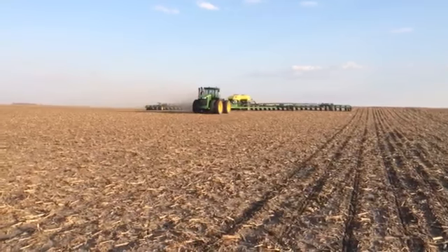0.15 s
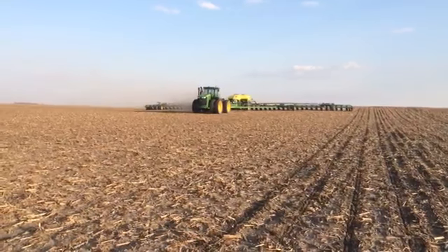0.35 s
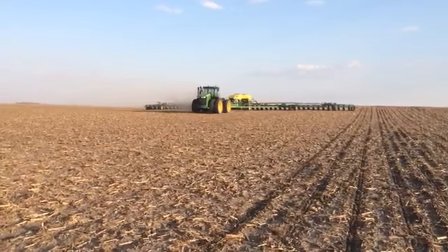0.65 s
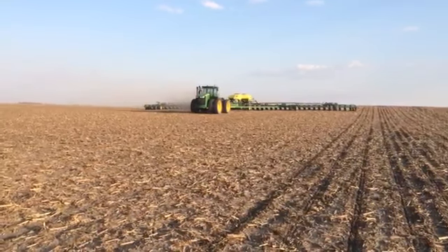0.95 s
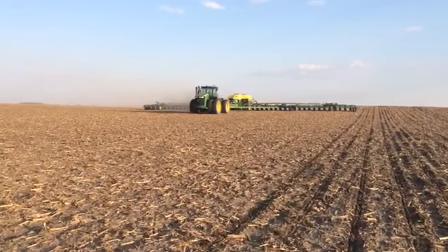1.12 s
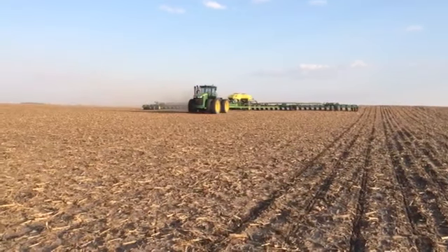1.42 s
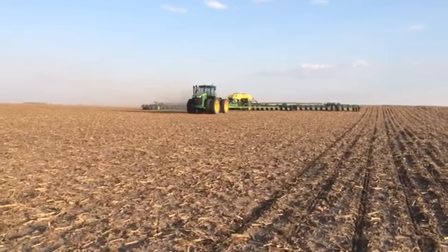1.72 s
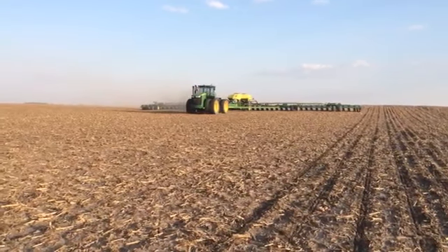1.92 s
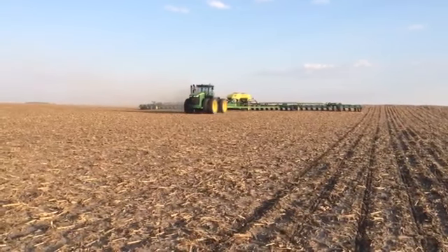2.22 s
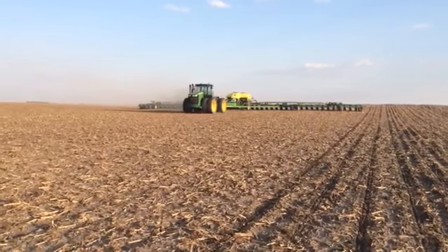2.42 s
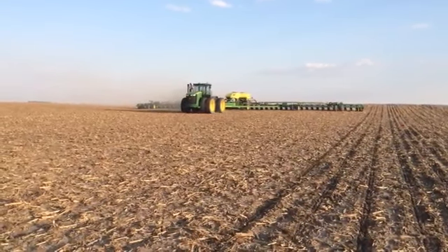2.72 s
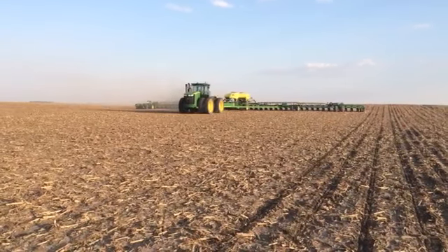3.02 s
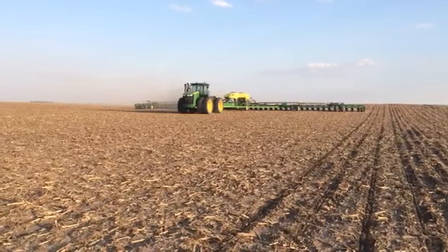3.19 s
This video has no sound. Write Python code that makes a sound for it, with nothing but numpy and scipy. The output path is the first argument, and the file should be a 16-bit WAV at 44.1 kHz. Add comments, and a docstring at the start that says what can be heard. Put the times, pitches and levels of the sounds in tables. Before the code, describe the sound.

Steady far-off tractor drone and thin high whine, outdoors in one channel. Low wind puffs knock irregularly on the nearby microphone, small squeaks are clearest after two seconds, and strong puffs hit near the end.

```python
"""A distant tractor pulls a wide planter over a dry field: noise roar, hissing rows, two sine fan notes.
From the start the air makes the whine flutter, and wind knocks on the microphone in short, dull puffs.
Small squeaks and rings, short sines, come and go; the clearest squeaks fall after two seconds.
Just past two seconds two gusts sweep upward as rising tones. Near the end a pair of strong puffs hits
and the upper fan note dips; by then the fan has crept up slightly and the treble of the hiss has grown."""
import sys
import numpy as np
from scipy import signal
from scipy.fft import rfft, irfft
from scipy.io import wavfile

SR = 44100
rng = np.random.default_rng(int(sys.argv[2]) if len(sys.argv) > 2 else 0)


def to_wav(s):
    """Save 16-bit WAV."""
    ch = np.atleast_2d(s).T  # columns
    pcm = np.round(np.clip(ch, -1, 1) * 32767)  # PCM
    wavfile.write(sys.argv[1], SR, pcm.astype(np.int16))


N = 147735

# Strength of the wind, for rumble and small eddies: t/s, relative level/dB
BREEZE = [(0, 5), (.1, 4), (.19, -15), (.26, 1), (.32, -9), (.48, 1.5), (.6, -9), (.75, 5.5), (1.02, 0.5),
          (1.18, -2), (1.5, 5), (1.58, -5), (1.7, 2), (2.25, 2), (2.55, 1), (3.05, 4), (3.22, -3),
          (3.35, -2)]
# Lumpy rumble between the puffs, spectrum shape: f/Hz, relative level/dB per Hz
RUMBLE_SPECTRUM = [(15, -30), (30, -20), (52, 3), (100, 5.5), (200, -1), (300, -13), (500, -12.5),
                   (900, -68), (3000, -66)]
# Puffs of wind on the microphone, slow thumps and quick flaps:
# t/s, centre f/Hz, time from peak to 1/e /s, level/dB (as the rms of a 10 ms sound of equal energy)
PUFFS = [(.013, 114, 0.0053, -19.5), (.046, 344, 0.0011, -24), (.075, 84, 0.0093, -21),
         (.078, 300, .0016, -29), (.158, 150, 0.0039, -28.5), (.263, 94, 0.0052, -23),
         (.368, 83, 0.0067, -21), (.413, 278, 0.001, -25), (.437, 251, 0.0018, -20.5),
         (.442, 82.6, 0.0095, -22), (.497, 93, 0.0056, -22), (.534, 83, 0.0069, -20),
         (.647, 346, 0.0014, -16.5), (.652, 453, .004, -23.5), (.657, 343, 0.0052, -25),
         (.706, 250, .002, -29), (.723, 198, .008, -24), (.728, 480, 0.0024, -28), (.775, 118, 0.0046, -20),
         (.812, 200, 0.0031, -22.5), (.857, 180, 0.0029, -23.5), (.863, 440, 0.0015, -24.5),
         (.946, 105, .004, -21.5), (.967, 104, 0.0026, -25), (.978, 190, 0.0021, -17.5),
         (1.014, 390, 0.0027, -24.5), (1.019, 145, .003, -25.5), (1.058, 83, 0.016, -24),
         (1.253, 143, 0.0048, -23), (1.257, 550, 0.0015, -20), (1.352, 161, 0.0021, -24.5),
         (1.429, 106, 0.0039, -24.5), (1.442, 93, 0.0033, -25.5), (1.513, 60, 0.014, -21),
         (1.523, 227, 0.0043, -25), (1.62, 374, 0.0032, -20), (1.628, 129, 0.012, -26),
         (1.657, 83, 0.005, -20), (1.669, 525, 0.004, -25), (1.671, 145, 0.0025, -22),
         (1.679, 310, 0.00083, -21.5), (1.748, 311, 0.001, -26), (1.756, 99, 0.0071, -28),
         (1.813, 278, 0.0023, -25.5), (1.99, 130, 0.0034, -25), (1.999, 435, 0.0017, -24.5),
         (2.035, 196, 0.0044, -22), (2.137, 82, 0.0053, -20), (2.192, 93, 0.0096, -21),
         (2.222, 278, 0.00099, -25.5), (2.275, 178, 0.0052, -21), (2.316, 83, 0.0093, -31),
         (2.403, 89.5, 0.0079, -26), (2.445, 410, 0.0034, -27), (2.452, 110, 0.0025, -23.5),
         (2.57, 139, 0.0047, -25), (2.66, 400, 0.0008, -28), (2.666, 93, 0.014, -29),
         (2.708, 93, 0.0043, -24.5), (2.794, 206, 0.0037, -26), (2.94, 93, 0.011, -21.5),
         (2.944, 482, 0.0019, -26.5), (2.998, 116, .011, -24), (3.074, 376, 0.0039, -26),
         (3.12, 138, 0.0037, -16.5), (3.126, 452, .003, -22), (3.131, 161, 0.0026, -18.5),
         (3.189, 142, 0.0054, -23)]
# Turbulence around a puff, spectrum shape: f/Hz, relative level/dB per Hz
SWIRL_SPECTRUM = [(20, -20), (70, 0.5), (170, 3), (300, -3.5), (500, -1.5), (700, -13.5), (1100, -26),
                  (2500, -58), (6000, -90)]
# Gusts that sweep upward: t/s, start f/Hz, end f/Hz, time from peak to 1/e /s, level/dB
GUSTS = [(2.06, 145, 508, 0.013, -24), (2.284, 258.3, 628, 0.0066, -26.5)]
# Faint squeaks of the row units: t/s, f/Hz, length between 1/e points/s, level/dB
SQUEAKS = [(.23, 5170, .06, -60), (.54, 2070, .03, -48), (.8, 5130, .05, -61), (1.18, 5210, .04, -58),
           (1.57, 5930, .14, -59), (1.985, 5000, .032, -50.5), (2.04, 5160, .06, -55),
           (2.11, 2024, .07, -41), (2.13, 5120, .05, -55), (2.32, 2020, .045, -45),
           (2.76, 2040, .04, -39.5)]
# Hiss of air and dry stubble, spectrum shape: f/Hz, relative level/dB per Hz
HISS_SPECTRUM = [(20, -36), (2000, -32), (2650, -7), (3200, 1.5), (3650, 2), (4200, -3), (4750, -7),
                 (6000, -7), (6800, -15.5), (7900, -16.5), (9500, -23), (11000, -26), (12300, -33.5),
                 (15000, -35)]
# Swell of the hiss: t/s, relative level/dB
HISS_SWELL = [(0, -2), (.6, 1), (.98, -1.5), (1.2, 0.5), (1.45, -0.5), (2.0, 1.6), (2.3, -1), (2.7, 2.5),
              (3, 2), (3.2, -0.5), (3.35, 1)]
# Roar of engine and planter, spectrum shape: f/Hz, relative level/dB per Hz
ROAR_SPECTRUM = [(20, -33), (60, -1), (110, -0.5), (250, -5.5), (420, -5.5), (620, -2.5), (720, -1),
                 (820, -4.5), (950, -3.5), (1130, -3.5), (1390, -2), (1490, -5.5), (1720, -6.5),
                 (1820, -10.5), (2080, -9.5), (2420, -15.5), (2600, -28), (3000, -47), (16000, -88)]
# Swell of the roar: t/s, relative level/dB
ROAR_SWELL = [(0, -0.5), (.43, 1.1), (.72, -0.1), (1.55, 1.6), (2.25, 1), (2.7, 1.5), (3.05, 3), (3.2, 0),
              (3.35, 3)]
# Fainter hums and whistles of the machinery: f/Hz, width/Hz, level/dB
WHINES = [(613, 4, -52), (932, 6, -53), (1030, 6, -52), (1084, 4, -51.5), (1226, 5, -54), (1338, 5, -53),
          (1400, 14, -50), (1868, 10, -58), (2029, 12, -52.5), (4660, 30, -73), (5140, 40, -65.5),
          (5601, 40, -72), (7470, 100, -76)]
# Blade rate of the fan: t/s, f/Hz
FAN_PITCH = [(0, 716.2), (.8, 716.1), (1.3, 717), (2.8, 717.2), (3.35, 718)]
# The two fan notes: multiple of the blade rate, steady level/dB before any swell, flutter share (rms)
FAN_NOTES = [(1, -38, 0.18), (2, -40.5, 0.38)]
# Swell of the upper fan note: t/s, relative level/dB
UPPER_NOTE_SWELL = [(0, -1), (.43, 3), (.75, 0), (1.6, 3), (1.85, -1.5), (3.05, 1.5), (3.2, -7.5),
                    (3.35, -1)]

RUMBLE_DB, RUMBLE_LUMPS_DB, RUMBLE_LUMPS_HZ = -35, 2.4, 19
SWIRL_DECAY_S, SWIRL_DB = .011, -7.5  # level against the swing of pressure
SMALL_EDDY_DB, SMALL_EDDY_HZ = -32, 194  # middle values; the breeze shifts the level
SMALL_EDDY_CYCLES = 0.46  # from peak to 1/e
GUST_ROUGHNESS, GUST_JOLTS_HZ = .55, 110
SQUEAK_WAVER_HZ, SQUEAK_WAVER_RATE_HZ = 14, 44
RING_LOW_HZ, RING_HIGH_HZ, RING_S, RING_DB = 1620, 2280, .028, -48
HISS_DB, TREBLE_FROM_HZ, TREBLE_DB_PER_S = -47, 7500, 1
ROAR_DB = -34.5
FIRING_HZ, FIRING_DEPTH = 102.4, .08
FLUTTER_HZ = 27
FADE_S, TOP_HZ = .003, 15000


def amp(db):
    """Turns decibels into gain."""
    return 10 ** (np.asarray(db) / 20)


def unit(x):
    """Scales a sound to rms 1."""
    return x / np.sqrt(np.mean(x ** 2) + 1e-20)


def clock():
    """Gives the time of every sample in seconds."""
    return np.arange(N) / SR


def curve(points):
    """Joins (t/s, value) points by straight lines."""
    return np.interp(clock(), *np.transpose(points))


def colour(x, points):
    """Filters a sound by a spectrum of (f/Hz, level/dB) points, straight on a log-pitch axis."""
    hz, db = np.transpose(points)
    f = np.fft.rfftfreq(len(x), 1 / SR)
    gain = amp(np.interp(np.log(f + 1), np.log(hz), db))
    return irfft(rfft(x) * gain, len(x))


def band(hz, width_hz):
    """Makes noise of rms 1 in a narrow resonance; around 0 Hz it is a slow random drift."""
    f = np.fft.rfftfreq(N, 1 / SR)
    random_phase = np.exp(2j * np.pi * rng.random(len(f)))
    resonance = (f > 0) / (1 + (2 * (f - hz) / width_hz) ** 4)
    return unit(irfft(random_phase * resonance, N))


def drift(rate_hz):
    """Wanders at random with rms 1, mostly slower than the given rate."""
    return band(0, 2 * rate_hz)


def tone(hz):
    """Sounds a sine of rms 1 that follows a pitch curve from a random phase."""
    return np.sqrt(2) * np.cos(2 * np.pi * (np.cumsum(hz) / SR + rng.random()))


def airborne(points, patchy_db, rate_hz, count=9):
    """Makes noise whose bands swell and fade separately on their way through moving air."""
    spectrum = rfft(colour(rng.standard_normal(N), points))
    f = np.fft.rfftfreq(N, 1 / SR)
    # Overlapping triangular bands, evenly spaced in log pitch
    place = np.interp(np.log(f + 1), np.log([400, 12000]), [0, count - 1])
    mix = np.zeros(N)
    for k in range(count):
        share = np.maximum(1 - abs(place - k), 0)
        mix += irfft(spectrum * share, N) * amp(patchy_db * drift(rate_hz))
    return unit(mix)


def eddy(hz, length_s, size=4096):
    """One swing of pressure wrapped in turbulence, with the energy of a 10 ms sound of rms 1."""
    t = (np.arange(size) - size // 2) / SR
    envelope = np.exp(-(t / length_s) ** 2)
    offset = np.exp(-(np.pi * hz * length_s) ** 2)  # leaves no steady push
    swing = envelope * (np.exp(2j * np.pi * hz * t) - offset)
    swing = (swing * np.exp(2j * np.pi * rng.random())).real
    swirl = colour(rng.standard_normal(size) * np.exp(-abs(t) / SWIRL_DECAY_S), SWIRL_SPECTRUM)
    burst = unit(swing) + amp(SWIRL_DB) * unit(swirl)
    return burst * np.sqrt(.01 * SR / np.sum(burst ** 2))


def wind(size=4096, count=70):
    """Eddies hit the microphone as thumps and flaps; small ones fall at random over a lumpy rumble."""
    breeze_db = curve(BREEZE)
    lumps_db = RUMBLE_LUMPS_DB * drift(RUMBLE_LUMPS_HZ)
    rumble = unit(colour(rng.standard_normal(N) * amp(breeze_db + lumps_db), RUMBLE_SPECTRUM))

    places = rng.integers(0, N, count)
    levels_db = SMALL_EDDY_DB + breeze_db[places] + rng.uniform(-4.185, 4.5, count)
    centres = SMALL_EDDY_HZ * 2 ** rng.uniform(-1.176, 1.2, count)  # spread in octaves
    small = zip(places / SR, centres, SMALL_EDDY_CYCLES / centres, levels_db)

    hits = np.zeros(N + 2 * size)
    for s, hz, length_s, db in list(PUFFS) + list(small):
        at = max(round(s * SR), 0)
        hits[at:at + size] += amp(db) * eddy(hz, length_s, size)
    centred = hits[size // 2:][:N]  # each eddy peaks at its listed time
    return centred + amp(RUMBLE_DB) * rumble


def gusts():
    """A quickening gust sheds eddies faster and faster, so its pitch rises, in ragged jolts."""
    out = np.zeros(N)
    jolts = 1 + GUST_ROUGHNESS * drift(GUST_JOLTS_HZ)
    for s, start_hz, end_hz, length_s, db in GUSTS:
        u = (clock() - s) / length_s
        rise = (1 + np.tanh(2 * u)) / 2
        sweep = tone(start_hz + (end_hz - start_hz) * rise)
        out += amp(db) * np.exp(-u ** 2) * jolts * sweep
    return out


def squeaks(count=45):
    """Dry bearings and discs sing briefly; loose steel parts ring at random; each is a short sine."""
    waver_hz = SQUEAK_WAVER_HZ * drift(SQUEAK_WAVER_RATE_HZ)
    t, out = clock(), np.zeros(N)
    rings = []
    for _ in range(count):
        ring_hz = rng.uniform(RING_LOW_HZ, RING_HIGH_HZ)
        rings.append((rng.uniform(0, N / SR), ring_hz, RING_S, rng.normal(RING_DB, 2)))
    for s, hz, length_s, db in list(SQUEAKS) + rings:
        near = abs(t - s) < 2 * length_s
        envelope = np.exp(-(2 * (t[near] - s) / length_s) ** 2)
        out[near] += amp(db) * envelope * tone(hz + waver_hz[near])
    return out


def planter():
    """Rows hiss as patchy noise, its treble slowly growing as the rig comes closer."""
    hiss = airborne(HISS_SPECTRUM, patchy_db=0.9, rate_hz=18.0)
    highpass = signal.butter(2, TREBLE_FROM_HZ, "high", fs=SR, output="sos")
    treble = signal.sosfiltfilt(highpass, hiss)
    nearer = amp(TREBLE_DB_PER_S * (clock() - clock().mean()))
    return amp(HISS_DB + curve(HISS_SWELL)) * (hiss + (nearer - 1) * treble)


def machinery():
    """Engine roar as noise, throbbing faintly at the firing rate, with narrow noise whines in it."""
    throb = 1 + FIRING_DEPTH * np.cos(2 * np.pi * FIRING_HZ * clock())
    noise = airborne(ROAR_SPECTRUM, patchy_db=0.92, rate_hz=7.0)
    roar = amp(ROAR_DB + curve(ROAR_SWELL)) * throb * noise
    whines = sum(amp(db) * band(hz, width_hz) for hz, width_hz, db in WHINES)
    return roar + whines


def fan():
    """Two clean blade tones that flutter in the wind; the upper one also swells and fades."""
    turn = 2 * np.pi * np.cumsum(curve(FAN_PITCH)) / SR
    notes = []
    for multiple, db, share in FAN_NOTES:
        # Separate drifts on cosine and sine stir both loudness and phase
        steady = (1 + share * drift(FLUTTER_HZ)) * np.cos(multiple * turn)
        stray = share * drift(FLUTTER_HZ) * np.sin(multiple * turn)
        notes.append(np.sqrt(2) * amp(db) * (steady + stray))
    lower, upper = notes
    return lower + amp(curve(UPPER_NOTE_SWELL)) * upper


def scene():
    """Sets the rig far off and the wind close by, in one channel."""
    return (wind() + gusts() + squeaks() + planter() + machinery() + fan())[None]


def record(dry):
    """Softens both ends and cuts everything above the top of the band."""
    ends = np.minimum(np.minimum(clock(), clock()[::-1]) / FADE_S, 1)
    lowpass = signal.firwin(511, TOP_HZ, window=("kaiser", 9), fs=SR)
    return signal.oaconvolve(dry * ends, lowpass[None], "same")


dry = scene()
out = record(dry)
to_wav(out)
```